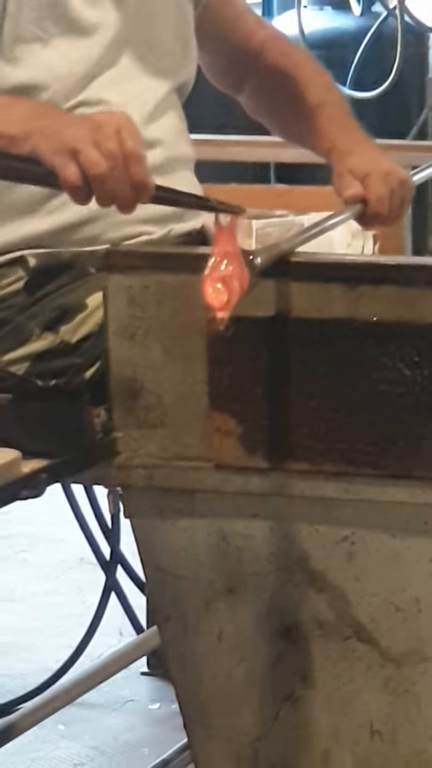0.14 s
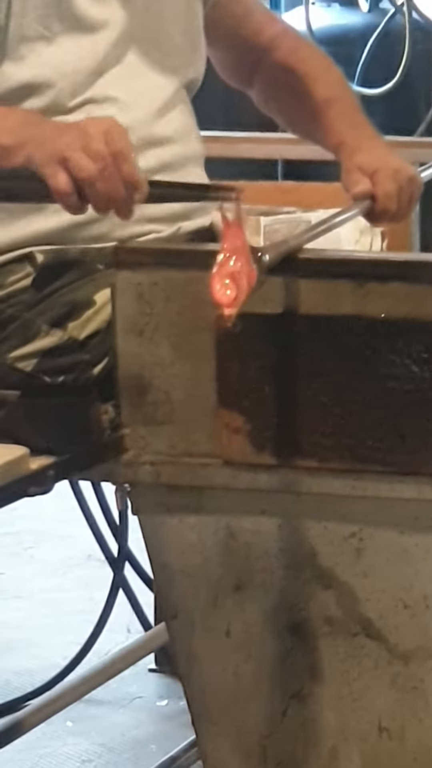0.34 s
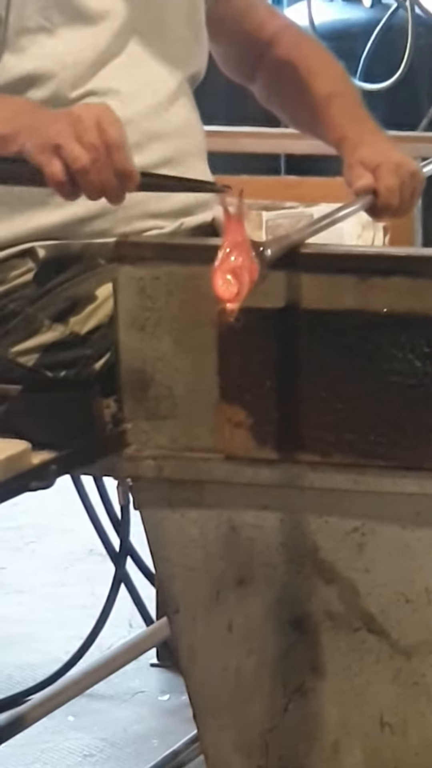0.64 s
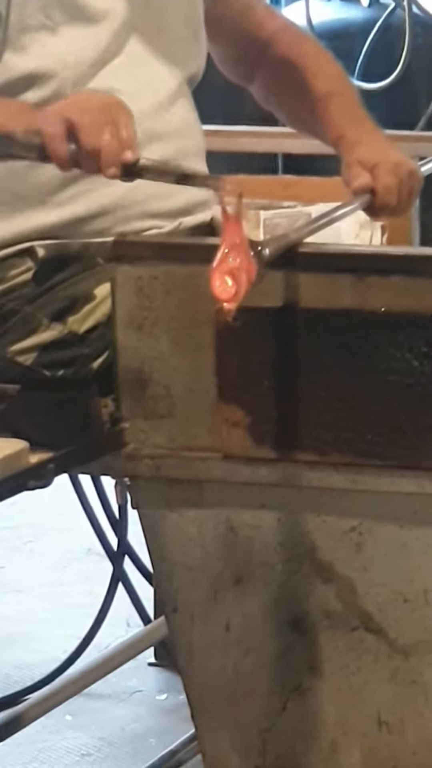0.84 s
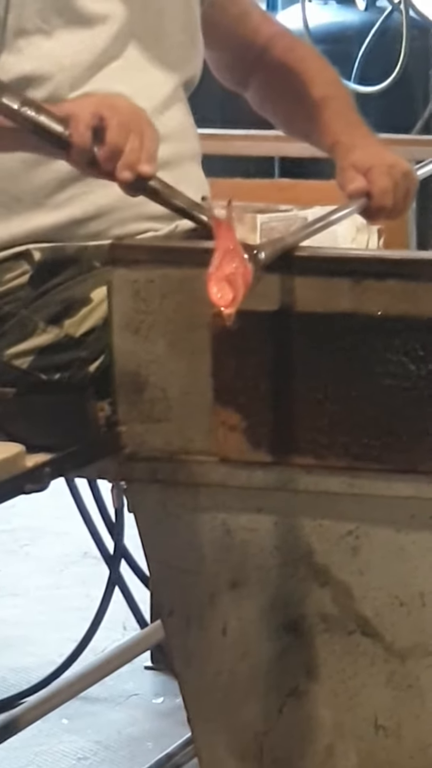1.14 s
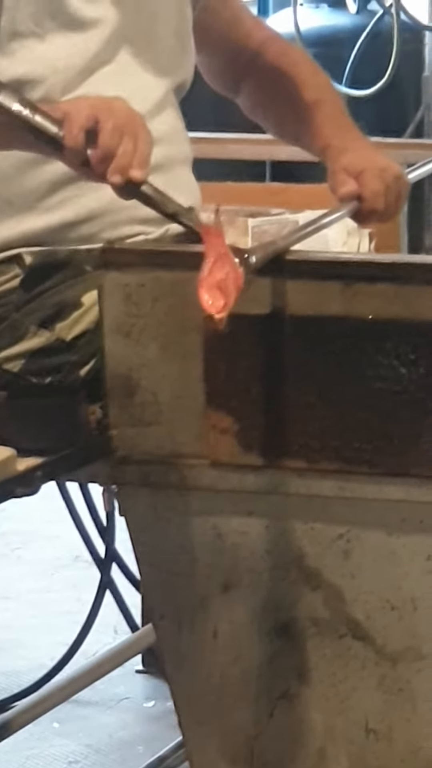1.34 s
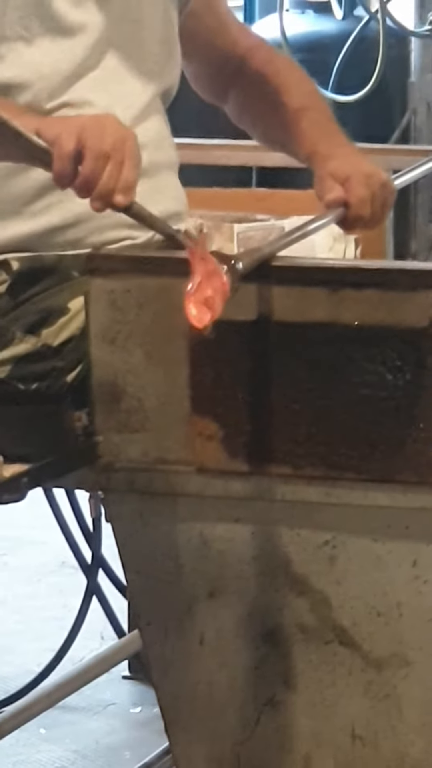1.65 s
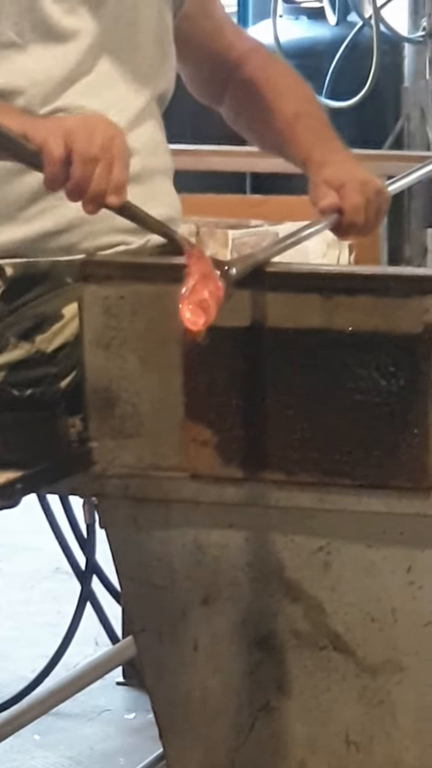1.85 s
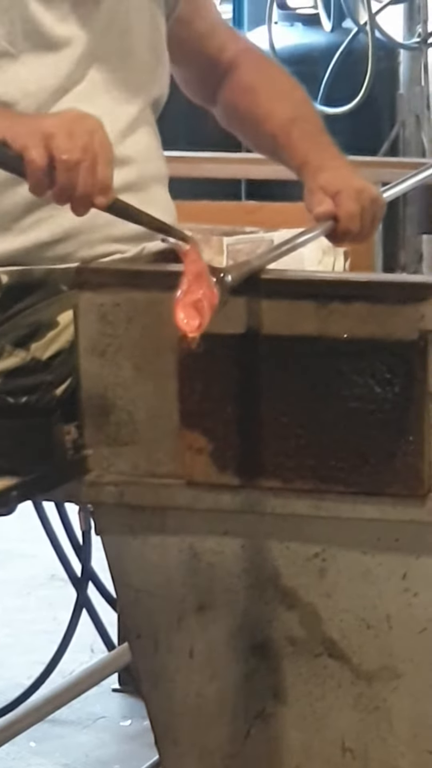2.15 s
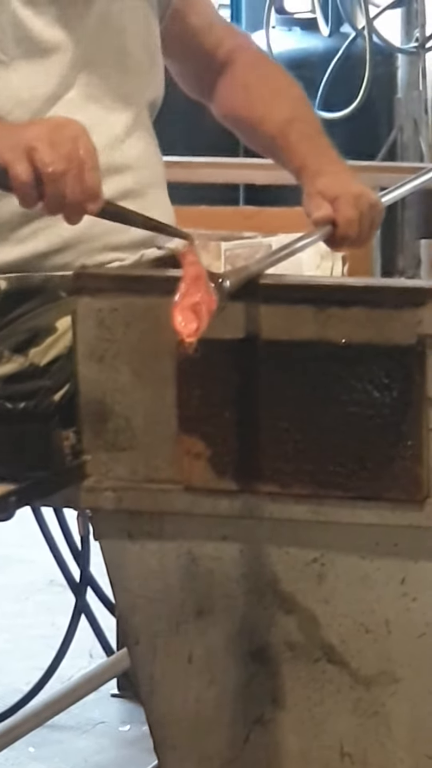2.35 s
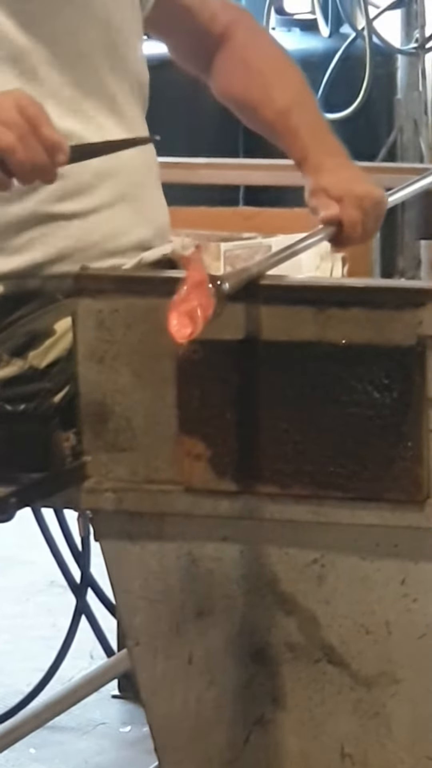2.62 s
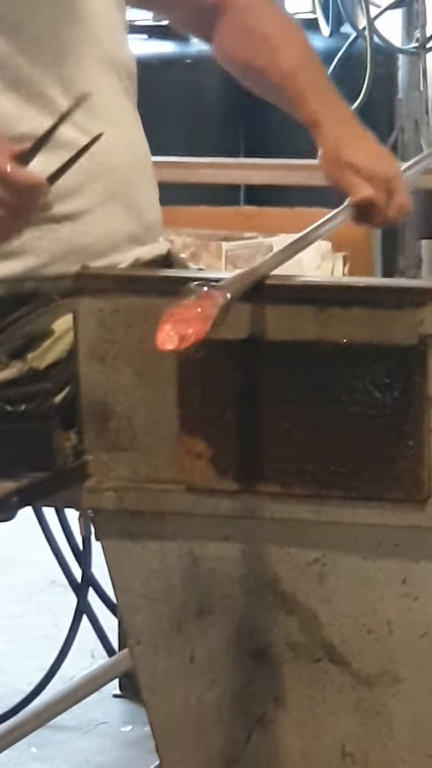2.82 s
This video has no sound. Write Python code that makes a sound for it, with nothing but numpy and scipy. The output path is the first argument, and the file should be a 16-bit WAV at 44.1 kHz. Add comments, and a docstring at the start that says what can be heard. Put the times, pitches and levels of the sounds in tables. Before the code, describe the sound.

Steady low furnace roar with fluttering flame surges, airy blower rush and a fine gas hiss

```python
"""A gas furnace roars steadily in a glass workshop, a few metres from the microphones.
Noise from its flame drives the low resonances of chamber and room, and surges in brief bursts.
Blower air rushes through ducts that ring faintly, a hollow tone comes and goes, and a motor hums.
The gas jet hisses. The bass is close to the centre, the hiss is all around."""
import sys
import numpy as np
from scipy import signal
from scipy.fft import rfft, irfft, next_fast_len
from scipy.io import wavfile
from scipy.ndimage import uniform_filter1d, map_coordinates

SR = 44100
rng = np.random.default_rng(int(sys.argv[2]) if len(sys.argv) > 2 else 0)


def dump_mix(stems):
    """Bounce the given channels to the path in sys.argv[1] as a 16-bit WAV at rate SR."""
    frames = np.atleast_2d(stems).T  # one column per channel
    limited = np.clip(frames, -1, 1)  # hard clip at full scale
    pcm = np.round(limited * 32767).astype(np.int16)
    wavfile.write(sys.argv[1], SR, pcm)


N = 131418  # length in samples


def amp(db):
    """Turn decibels into gain."""
    return 10 ** (np.asarray(db) / 20)


def unit(x):
    """Scale to an average strength (rms) of 1."""
    return x / np.sqrt(np.mean(x ** 2) + 1e-20)


def along(points, hz):
    """Read a table of (f/Hz, value) at any frequency, on a log axis."""
    f, value = np.transpose(points)
    return np.interp(np.log(hz + 1), np.log(f + 1), value)


def curve(rows):
    """Read a table of (t/s, value) at every sample."""
    return np.interp(np.arange(N) / SR, *np.transpose(rows))


def wobble(rate):
    """A smooth random curve through rate random points a second."""
    points = rng.standard_normal(N // 100)
    return map_coordinates(points, [np.arange(N) * rate / SR], mode="mirror")


def pan(db):
    """Left and right gains that make the left louder than the right by db."""
    return amp(np.array([[db], [-db]]) / 2)


def filtered(x, response):
    """Shape the spectrum of x by a response that depends on frequency."""
    m = next_fast_len(N + SR // 4)
    return irfft(rfft(x, m) * response(np.fft.rfftfreq(m, 1 / SR)), m)[..., :N]


# How alike left and right are: f/Hz, correlation (1 same, 0 unrelated, -1 opposite)
LEFT_RIGHT_LIKENESS = [(50, 0.99), (200, 0.97), (340, 0.88), (480, 0.67), (800, 0.36), (1050, -0.07),
                       (1400, -0.21), (1750, 0.08), (2400, 0.24), (3000, 0.064), (7000, -0.12),
                       (10000, 0.081), (11500, 0.21), (15000, 0.05)]


def rush(shape):
    """Steady stereo noise of rms 1: random phases, coloured by shape, spread between the two sides."""
    m = next_fast_len(N + SR // 16)
    hz = np.fft.rfftfreq(m, 1 / SR)
    # this share of middle and side gives left and right the wanted correlation
    turn = np.arccos(np.clip(along(LEFT_RIGHT_LIKENESS, hz), -1, 1)) / 2
    phases = np.exp(2j * np.pi * rng.random((2, len(hz))))
    spectra = phases * shape(hz) * [np.cos(turn), np.sin(turn)]
    mid, side = irfft(spectra, m)[:, :N]
    return unit(np.array([mid + side, mid - side]))


def resonance(centre_hz, width):
    """Turbulence ringing in one resonance: noise that peaks at centre_hz and falls away on both sides."""
    return rush(lambda hz: 1 / (1 + ((hz - centre_hz) / width) ** 2) ** 1.26)


def steady(x, span_s, hold):
    """Even out the level of a stereo sound over span_s; hold 0 leaves it free, 1 keeps it constant."""
    window = signal.windows.hann(int(span_s * SR))
    power = np.abs(signal.fftconvolve(np.mean(x ** 2, axis=0), window, "same")) + 1e-12
    evened = x / power ** (np.clip(hold, 0, 1) / 2)
    return x.std() * unit(evened)


# evening of the resonances and the rumble, which the flow keeps fed
FEED_S, FEED_HOLD = .16, .45  # span (s), firmness (0-1)


def ringing(modes):
    """A group of low resonances, fed fairly evenly by the flame."""
    group = sum(amp(db) * resonance(hz, width) for hz, width, db in modes)
    return steady(group, FEED_S, FEED_HOLD)


RIPPLE_DB, RIPPLE_SPACING_HZ = 1.3, 17  # typical depth and spacing of the room's peaks and notches


def room(x):
    """Wall reflections comb the spectrum with fixed narrow peaks and notches, different on each side."""
    knots = rng.standard_normal((2, SR // 16))

    def comb(hz):
        ripple = [map_coordinates(k, [hz / RIPPLE_SPACING_HZ], mode="mirror") for k in knots]
        return unit(amp(RIPPLE_DB * np.array(ripple)))

    return filtered(x, comb)


def patchy(x, depth_db):
    """Eddies: each patch of the spectrum swells and fades on its own."""
    z = signal.stft(x, nperseg=512)[2]
    field = rng.standard_normal(z.shape[1:])
    field = uniform_filter1d(field, size=5, axis=0)  # smooth over frequency
    field = uniform_filter1d(field, size=12, axis=1)  # smooth over time
    return signal.istft(z * amp(depth_db * unit(field)), nperseg=512)[1][:, :N]


FLAME_DB = -37
# Colour of the burning noise between the resonances: f/Hz, relative level/dB
FLAME_COLOUR = [(20, -40), (32, -26), (44, -6.5), (70, -4.5), (108, -13), (135, -8.5), (200, -4.5),
                (245, -9.5), (340, -14), (430, -21.5), (800, -41), (3000, -80)]


def rumble():
    """Burning makes broad low noise, which the flow keeps fairly even."""
    noise = rush(lambda hz: amp(along(FLAME_COLOUR, hz)))
    return steady(amp(FLAME_DB) * noise, FEED_S, FEED_HOLD)


SURGE_S = .019  # time from the peak of a surge until its rise in dB is down to about a third
# Brief surges of the flame: t/s, rise in level/dB
FLAME_SURGES = [(.04, 6), (.07, 6), (.102, 7.5), (.187, 3.5), (.261, 4), (.4, 2.5), (.459, 6), (.565, 4.5),
                (.639, 3), (.755, 5.5), (1.095, 4.5), (1.334, 5.5), (1.511, 4), (1.648, 6), (1.77, 3),
                (1.893, 5.5), (1.94, 4.5), (2.043, 3.5), (2.103, 3), (2.154, 5), (2.292, 3), (2.446, 3.5),
                (2.505, 5), (2.644, 4.5), (2.762, 4), (2.822, 5.5)]


def surges():
    """The flame flares up briefly about nine times a second; gives the rise in dB at every sample."""
    t = np.arange(N) / SR
    return sum(db * np.exp(-((t - peak_s) / SURGE_S) ** 2) for peak_s, db in FLAME_SURGES)


THROB_SURGE_SHARE = .4  # how much of each surge, in dB, reaches the deep throb
# Deepest resonances of chamber and room: f/Hz, width/Hz, level/dB before swell and surges
THROB_MODES = [(54, 3.9, -39.5), (63.6, 8.1, -44.5), (87.6, 11.3, -40.5)]
# Swell of the throb: t/s, level/dB
THROB_LEVEL = [(0, -4), (.22, 2), (.3, -2), (.42, 3), (.6, 2), (.7, 0), (.8, 4.5), (.88, 2), (1.08, 0),
               (1.2, -9), (1.43, 1.5), (1.51, -0.5), (1.95, 2), (2.2, -6), (2.32, 5), (2.53, -5),
               (2.75, -5), (2.88, 3.5), (2.98, -4)]


def throb(surge_db):
    """The flame drives the deepest resonances, which swell and sink and follow part of each surge."""
    return amp(curve(THROB_LEVEL) + THROB_SURGE_SHARE * surge_db) * ringing(THROB_MODES)


BURN_S, BURN_HOLD = .07, .85  # evening of the main roar: span (s), firmness (0-1)
# Lower resonances of the main roar: f/Hz, width/Hz, level/dB before swell
DRONE_MODES = [(124.3, 6.9, -32.5), (133.4, 4.7, -38.5)]
# Swell of these lower resonances, before the roar is evened out: t/s, level/dB
DRONE_LEVEL = [(0, -3), (.09, 5), (.19, -9), (.45, -1), (.8, -3), (.92, -9), (1.1, -2.5), (1.32, 3.5),
               (1.5, 0), (1.7, -4.5), (1.93, 0.5), (2.2, 2), (2.35, -2.5), (2.55, 1), (2.98, 3)]
# Upper resonances of the main roar: f/Hz, width/Hz, level/dB before evening and surges
BOOM_MODES = [(156.7, 3.6, -35.5), (172.3, 6.9, -35), (186, 4.8, -37.5)]
# Level of the main roar between surges: t/s, level/dB
MAIN_ROAR_LEVEL = [(0, -4.5), (.06, -1), (.45, -.5), (1.3, -2.5), (1.95, -.5), (2.85, -1.5), (2.98, -6)]


def main_roar(surge_db):
    """Chamber and room resonances driven by the flame, held nearly even and lifted by each surge."""
    drone = amp(curve(DRONE_LEVEL)) * ringing(DRONE_MODES)
    body = steady(drone + ringing(BOOM_MODES), BURN_S, BURN_HOLD)
    return amp(curve(MAIN_ROAR_LEVEL) + surge_db) * body


BASS_PAN_DB, LEFT_LEAD_S = .75, .00008  # the left is slightly louder and earlier
# Higher resonances of chamber and room, free of surges: f/Hz, width/Hz, level/dB
HOLLOW_MODES = [(206.4, 6.2, -44.5), (224.5, 6.7, -42.5), (285.5, 7.6, -49.5), (323, 12, -48.5),
                (368.4, 6.5, -52.5)]


def flame():
    """The flame's rumble, throb, main roar and hollow resonances, heard near the centre."""
    surge_db = surges()
    roar = rumble() + throb(surge_db) + main_roar(surge_db) + ringing(HOLLOW_MODES)
    lead = np.array([[1], [-1]]) * LEFT_LEAD_S  # each side shifts by half the lead
    return pan(BASS_PAN_DB) * filtered(roar, lambda hz: np.exp(1j * np.pi * hz * lead))


AIR_DB, AIR_PAN_DB, EDDY_DB = -39.5, 1, 1.0  # level, left minus right, typical depth of the eddies
# Colour of the blower air: f/Hz, relative level/dB
AIR_COLOUR = [(150, -9), (380, -0.5), (520, 1), (680, 2), (780, 3.5), (900, 0.5), (1000, -3.5),
              (1165, -2.5), (1250, 0), (1510, -4.5), (1610, -8.5), (1750, -5.5), (2050, -5), (2250, -8.5),
              (2450, -7), (2850, -13.5), (4000, -15.5), (8000, -46), (16000, -70)]


def blower_air():
    """Rushing air is broad noise whose patches swell and fade as it eddies, coloured by the room."""
    air = patchy(rush(lambda hz: amp(along(AIR_COLOUR, hz))), EDDY_DB)
    return room(amp(AIR_DB) * pan(AIR_PAN_DB) * air)


# Resonances of the ducts: f/Hz, width/Hz, level/dB, left minus right/dB
DUCT_MODES = [(472, 6.7, -56.5, -5), (599, 6.3, -55.5, -7.5), (770, 7.4, -58, -2), (821.5, 12, -57, 8),
              (844, 7, -59, 9), (885, 12, -61, 3), (916, 8, -62, -7), (1091, 6.1, -56.5, 8),
              (1113, 15, -62, 2), (1258, 5, -60, -8), (1382, 11, -59, 9), (1528, 31, -59.5, 11.5),
              (2358, 16, -64.5, 10)]


def ducts():
    """The air makes each duct resonance ring faintly at its own place between left and right."""
    ring = 0
    for hz, width, db, side_db in DUCT_MODES:
        ring = ring + amp(db) * pan(side_db) * steady(resonance(hz, width), FEED_S, FEED_HOLD)
    return ring


TONE_HZ, TONE_WAVER_HZ, TONE_PAN_DB = 820, 5.94, 6  # pitch, its typical waver, left minus right
# Level of the hollow tone: t/s, level/dB
HOLLOW_TONE_LEVEL = [(0, -51), (.15, -50), (.4, -59), (.9, -58), (1.3, -52.5), (1.75, -57), (2.1, -49.5),
                     (2.5, -54.5), (2.98, -49.5)]


def hollow_tone():
    """A single sine of wavering pitch that comes and goes, mostly on the left."""
    pitch = TONE_HZ + TONE_WAVER_HZ * wobble(rate=22)
    sine = np.sin(2 * np.pi * np.cumsum(pitch) / SR)
    return amp(curve(HOLLOW_TONE_LEVEL)) * pan(TONE_PAN_DB) * unit(sine)


HUM_HZ, HUM_DB = 99.2, -40


def motor_hum():
    """The motor hums as one steady low sine, louder on the left."""
    cycles = HUM_HZ * np.arange(N) / SR + rng.random()
    return pan(db=4) * amp(HUM_DB) * unit(np.sin(2 * np.pi * cycles))


HISS_LEFT_DB, HISS_RIGHT_DB = -45.5, -41.5
HISS_FLUTTER_DB = .43  # typical flicker of the level
# Colour of the hiss at the left microphone: f/Hz, relative level/dB
HISS_LEFT_COLOUR = [(1200, -13), (2900, -5.5), (3700, -2), (4000, -2.5), (4500, 2), (5750, -3), (6500, -3),
                    (7700, -7.5), (8700, -9), (10200, -4.5), (11700, 0), (12750, -3.5), (13500, -10),
                    (15500, -17)]
# Colour of the hiss at the right microphone: f/Hz, relative level/dB
HISS_RIGHT_COLOUR = [(1200, -30), (2900, -8), (3700, -3.5), (4000, -4), (4900, 1), (5600, -2), (6150, 2.5),
                     (7150, 4.5), (7650, -5.5), (8700, -14), (10300, -9), (11750, -0.5), (12700, -1),
                     (13300, -10), (15500, -14.5)]


def gas_jet():
    """The jet's smooth hiss is noise with its own colour at each microphone, stronger on the right."""
    colour = lambda hz: amp([along(HISS_LEFT_COLOUR, hz), along(HISS_RIGHT_COLOUR, hz)])
    left, right = filtered(rush(np.ones_like), colour)
    pair = np.array([amp(HISS_LEFT_DB) * unit(left), amp(HISS_RIGHT_DB) * unit(right)])
    return room(pair) * amp(HISS_FLUTTER_DB * wobble(rate=45))


def scene():
    """The furnace flame with its blower, ducts, hollow tone, motor and gas jet."""
    blower = blower_air() + ducts() + hollow_tone() + motor_hum()
    return flame() + blower + gas_jet()


LOW_CUT_HZ, TOP_HZ = 32, 15720


def record(dry):
    """The recorder cuts the deepest bass and keeps nothing above its band limit."""

    def band(hz):
        rise = (hz / LOW_CUT_HZ) ** 2
        return rise / np.hypot(1, rise) * (hz < TOP_HZ)

    return filtered(dry, band)


dry = scene()
out = record(dry)
dump_mix(out)
```